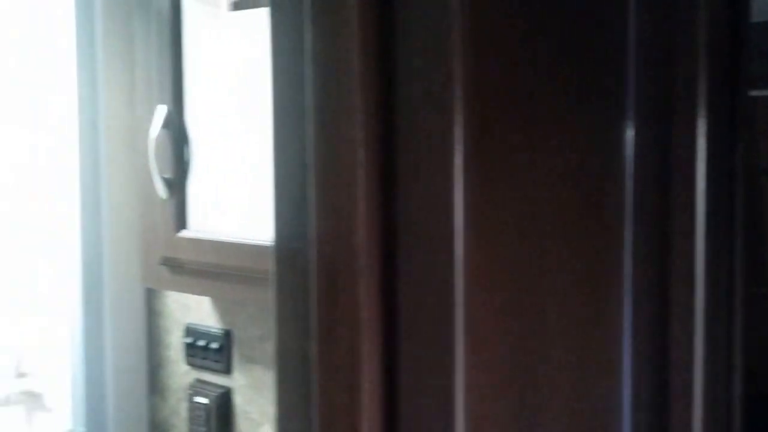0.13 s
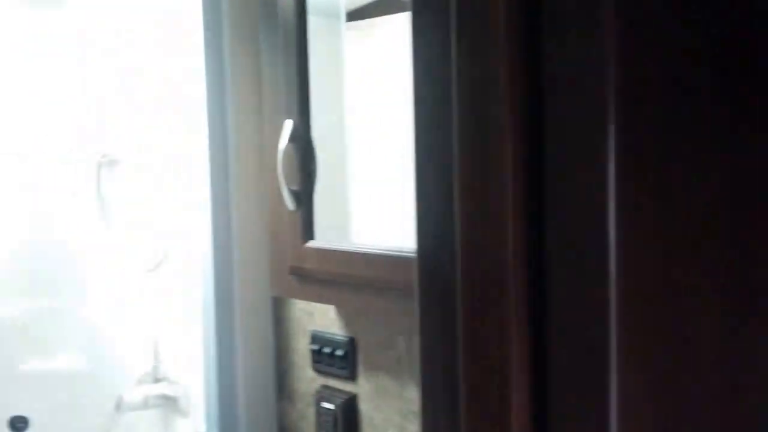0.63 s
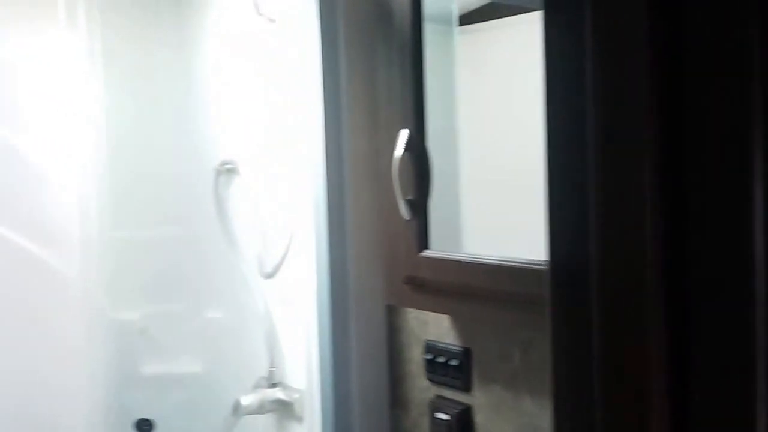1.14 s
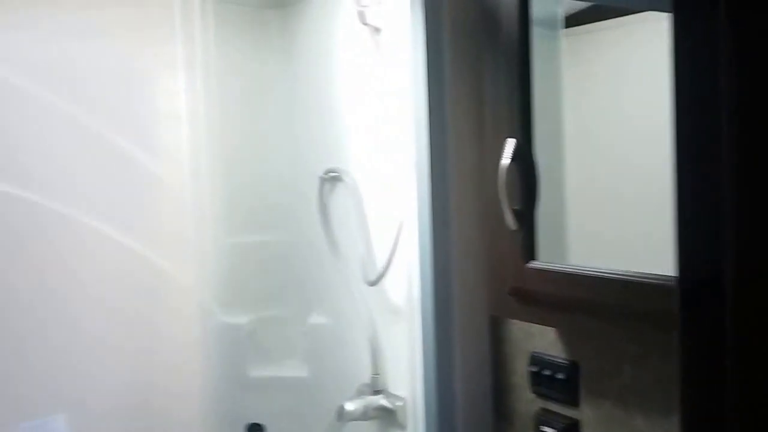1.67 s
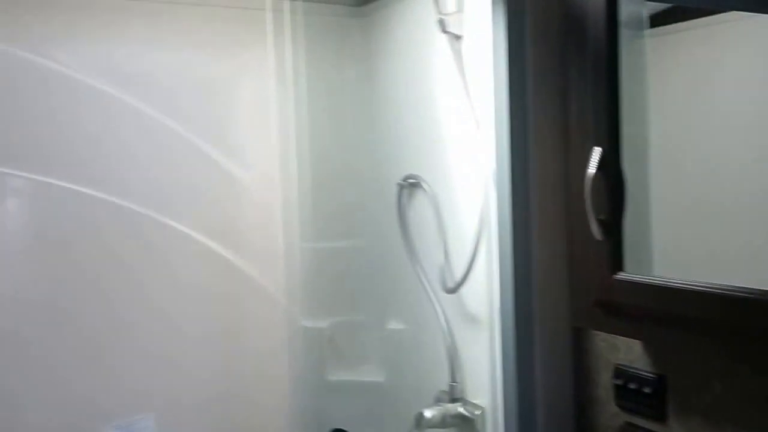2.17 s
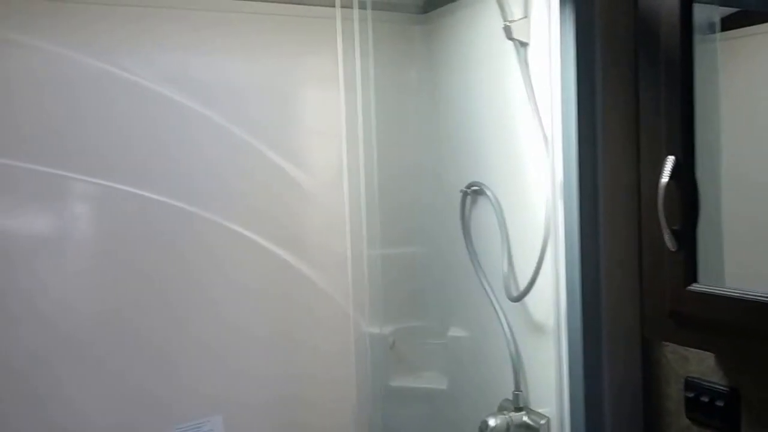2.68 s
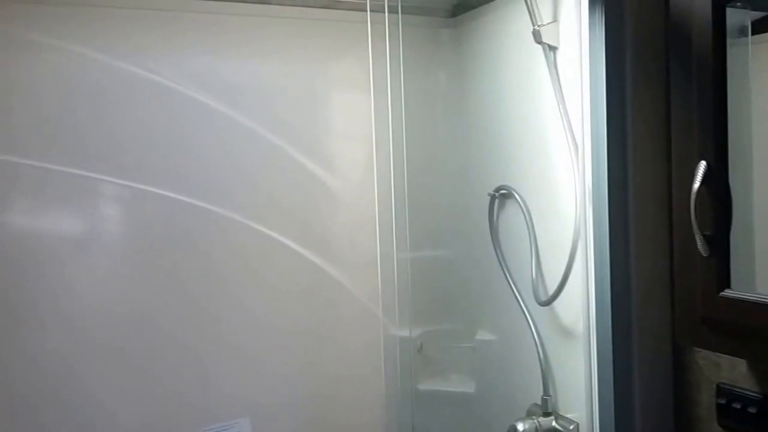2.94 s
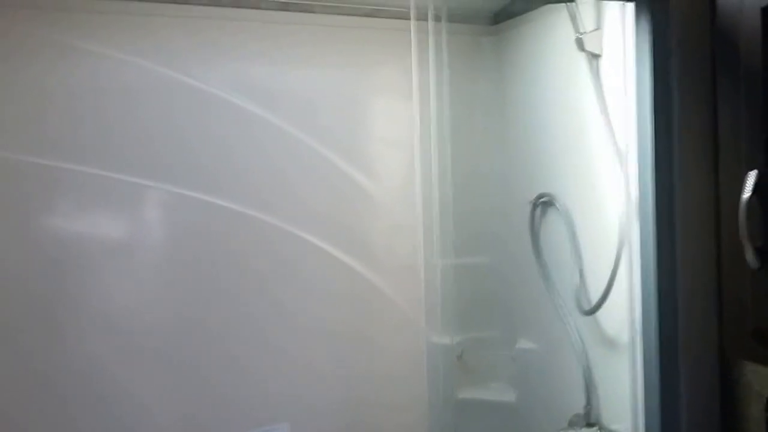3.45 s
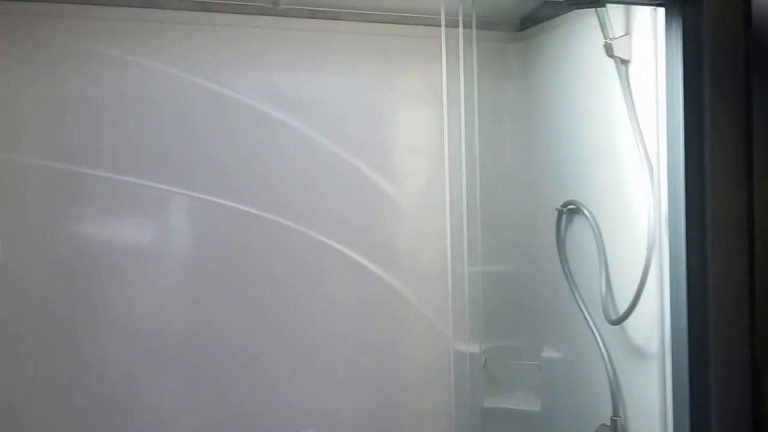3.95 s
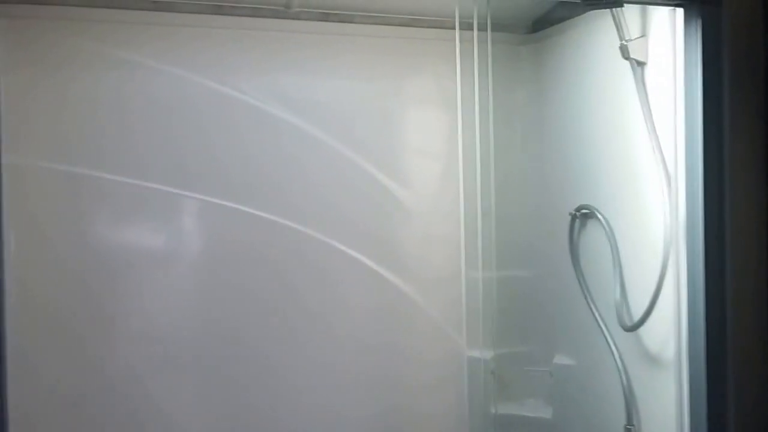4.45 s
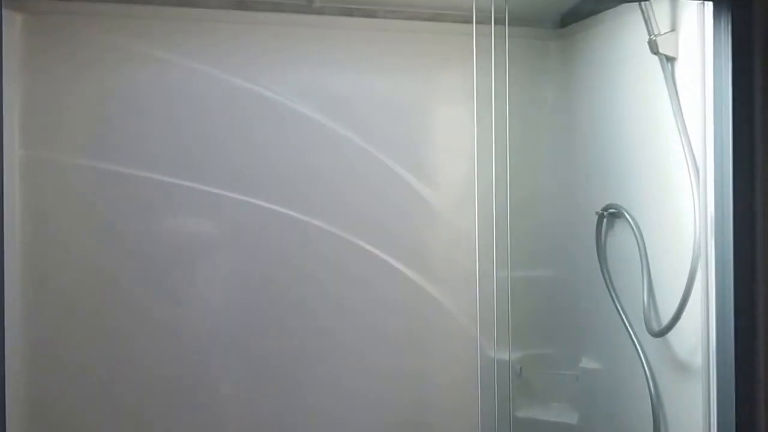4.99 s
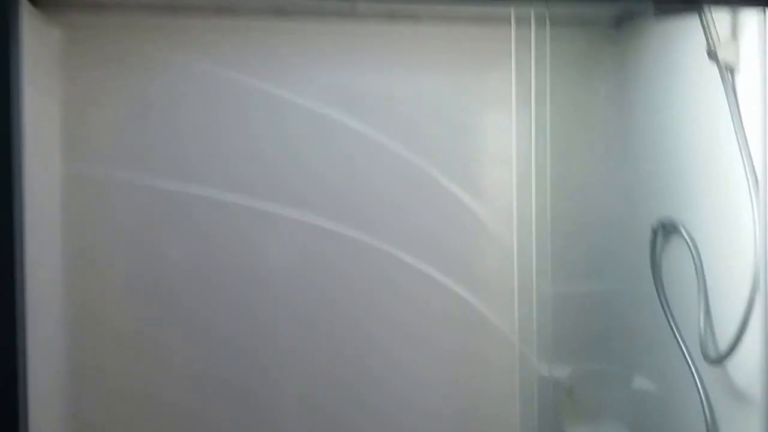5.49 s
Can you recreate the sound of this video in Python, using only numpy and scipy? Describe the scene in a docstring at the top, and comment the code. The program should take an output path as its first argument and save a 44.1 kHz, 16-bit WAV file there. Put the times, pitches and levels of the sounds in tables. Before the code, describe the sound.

Handling noise in a quiet camper: bass tremor from the gripping hand, skin rubbing plastic, scattered dull knocks, and one hard rattling blow near the end.

```python
"""Handling noise in a quiet camper

A hand-held camera is carried through a quiet camper, over faint microphone hiss and a weak hum.
The gripping hand is heard as a throbbing bass tremor and as shaped noise where skin slides on plastic.
Dull knocks are short tones of falling pitch with a noisy crunch; thin swishes are narrow noise bands.
One hard blow sets a small part rattling: rough taps that excite a few resonances.
"""
import sys
import numpy as np
from scipy import signal
from scipy.fft import rfft, irfft, next_fast_len
from scipy.io import wavfile
from scipy.ndimage import uniform_filter1d, map_coordinates

SR = 44100
rng = np.random.default_rng(int(sys.argv[2]) if len(sys.argv) > 2 else 0)


def digitize_waveform(pressure):
    """Quantize a signal to 16-bit integers and store it at the path in sys.argv[1].

    Rows of a 2-D input are taken as channels; values are limited to [-1, 1].
    """
    field = np.atleast_2d(pressure).T
    bounded = np.clip(field, -1, 1)
    quanta = np.round(bounded * 32767).astype(np.int16)
    wavfile.write(sys.argv[1], SR, quanta)


def gain_from_decibels(decibels):
    """Convert decibel values to linear amplitude factors."""
    exponent = np.asarray(decibels, float) / 20
    return 10 ** exponent


N = 247401  # length in samples


def unit(x):
    """Scales a sound to rms 1."""
    return x / np.sqrt(np.mean(x ** 2) + 1e-20)


def along(points, hz):
    """Reads (f/Hz, value) points on a logarithmic frequency axis."""
    f, value = np.transpose(points)
    return np.interp(np.log(hz + 1), np.log(f + 1), value)


def curves(rows):
    """Gives one value per sample for each column after the time."""
    times, *columns = np.transpose(rows)
    return [np.interp(np.arange(N) / SR, times, column) for column in columns]


def wobble(rate):
    """Draws a smooth random curve with rate knots a second."""
    knots = rng.standard_normal(N // 50)
    return map_coordinates(knots, [np.arange(N) * rate / SR])


def filtered(x, response):
    """Filters x by a response that may be complex, given as a function of frequency in Hz."""
    size = next_fast_len(N + SR // 2)
    hz = np.fft.rfftfreq(size, 1 / SR)
    return irfft(rfft(x, size) * response(hz), size)[..., :N]


def noise(spectrum):
    """Makes coloured noise of rms 1."""
    white = rng.standard_normal(N)
    return unit(filtered(white, lambda hz: gain_from_decibels(along(spectrum, hz))))


# Colour of the microphone noise: (f/Hz, level/dB per Hz)
HISS = [(150, -36.5), (250, -1.5), (600, -1.5), (1000, 0), (1550, -.5), (3600, -4.5), (4600, -10.5),
        (16000, -18)]
# How alike the noise is at the two ports: (f/Hz, left-right likeness)
HISS_ALIKE = [(60, 0.87), (180, 0.32), (550, 0.31), (1650, 0.98), (4970, 0.27), (15000, 0.15)]


def hiss():
    """Microphone noise: two independent noises are mixed so that both ports share part of it."""
    level_db = -76

    def mix(hz):
        turn = np.arccos(np.clip(along(HISS_ALIKE, hz), -1, 1)) / 2
        return np.array([np.cos(turn), np.sin(turn)])

    mid, side = filtered(np.array([noise(HISS), noise(HISS)]), mix)
    return gain_from_decibels(level_db) * np.array([mid + side, mid - side])


# Loudness of the hum before it wavers: (t/s, level/dB)
HUM = [(0, -85), (4.6, -84), (4.8, -73), (5.0, -78), (5.35, -66), (5.61, -68)]


def hum():
    """A weak low tone whose level and pitch waver."""
    level_db = curves(HUM)[0] + 3 * wobble(9)
    hz = 188 + 4 * wobble(12)
    return gain_from_decibels(level_db) * np.sin(2 * np.pi * np.cumsum(hz) / SR)


# Two thin swishes, each a list of rows: (t/s, centre f/Hz, level/dB)
SWISH = [
    [(0.0, 5100, -72), (0.08, 4700, -75), (0.2, 4050, -78), (0.38, 3890, -80), (0.45, 3800, -100)],
    [(5.285, 6250, -66), (5.383, 6100, -73), (5.473, 5800, -71), (5.54, 5400, -80), (5.61, 5110, -76)],
]
# Colour of the broad hiss under them: (f/Hz, level/dB per Hz)
SKIRT = [(1000, -11), (2200, 2), (4500, -3.5), (7000, -21.5)]


def swish():
    """A narrow band of noise on a broad hiss; its centre sinks as the slide slows."""
    out, t = np.zeros(N), np.arange(N) / SR

    def band_shape(f):
        return 1 / (1 + (f / 480) ** 2) + 0.26 / (1 + (f / 1200) ** 4)

    for rows in SWISH:
        centre_hz, db = curves(rows)
        low_noise = filtered(rng.standard_normal(N), band_shape)
        # multiplying by a sine moves the low noise up to the centre
        band = unit(low_noise * np.sin(2 * np.pi * np.cumsum(centre_hz) / SR))
        active = 1. * (t >= rows[0][0]) * (t <= rows[-1][0])
        on = uniform_filter1d(active, size=1800)  # softened ends
        out += on * gain_from_decibels(db) * (band + .85 * noise(SKIRT))
    return out


# Strength of the muscle tremor, also used for the resting hand: (t/s, level/dB)
GRIP = [(0.0, -53), (0.2, -47), (0.7, -45), (1.14, -48), (1.37, -43), (1.6, -55), (1.72, -48), (1.97, -46),
        (2.36, -54), (3.1, -52), (3.22, -64), (3.58, -56), (4.14, -62), (4.3, -47), (4.47, -44), (4.7, -59),
        (5.1, -57), (5.45, -52), (5.61, -62)]
# Colour of the tremor: (f/Hz, level/dB per Hz)
TREMOR = [(15, -50.5), (25, -26.5), (40, -10.5), (81, -2), (97, -10), (216, -27.5), (250, -28.5),
          (320, -55), (550, -120)]


def tremor():
    """Muscle tremor: bass noise that throbs at random."""
    throbbing = gain_from_decibels(1.6 * wobble(8.5)) * noise(TREMOR)
    return gain_from_decibels(curves(GRIP)[0]) * unit(throbbing)


# Short scuffs and, in the last row, a brief noise that leads into the hard blow: (peak t/s, rise/s per 10 dB,
# fall/s per 10 dB, dull level/dB, bright level/dB) # Rise and fall are those of the dull rub; the bright level
# is before the speed dulls it.
SHORT_SWELLS = [(1.66, .025, .08, -55, -76), (1.712, .05, .03, -49, -57), (1.845, .05, .05, -52, -72),
                (1.94, .045, .07, -44, -53), (2.04, .05, .07, -50, -64), (2.16, .03, .06, -60, -78),
                (2.3, .07, .055, -54, -72), (2.47, .02, .05, -65, -76), (2.8, .05, .03, -66, -80),
                (2.98, .07, .05, -60, -70), (3.5, .06, .04, -68, -85), (3.6, .04, .12, -70, -77),
                (4.24, .04, .05, -68, -85), (4.33, .042, .045, -47, -46), (4.53, .006, .05, -57, -64),
                (4.87, .04, .08, -72, -85), (5.2, .08, .03, -64, -85), (5.238, .006, .01, -42, -55)]
# Long slides of the skin, each a list of rows: (t/s, dull level/dB, bright level/dB, speed 0-1)
# The bright level is before the speed dulls it.
SLIDES = [
    [(0.0, -48.5, -47, .49), (0.27, -54.5, -48, .63), (0.56, -52, -51, .62), (0.81, -58, -55, .43),
     (0.85, -62, -64, .45), (0.95, -68, -75, .6)],
    [(1.2, -62, -66, .6), (1.228, -50, -41, .55), (1.25, -51, -45, .72), (1.275, -54, -49, .72),
     (1.29, -53, -46, .72), (1.34, -56, -52.5, .78), (1.42, -54, -52, .65), (1.447, -47, -45, .55),
     (1.47, -57, -69, .75), (1.58, -68, -80, .9)],
    [(4.36, -58, -62, .5), (4.42, -58, -60, .55), (4.445, -57, -54, .62), (4.52, -65, -68, .7),
     (4.63, -74, -76, .7)],
    [(5.26, -62, -54, .5), (5.3, -57.5, -60, .44), (5.44, -64, -65, .3), (5.452, -68, -56, .95),
     (5.5, -68, -62, .85), (5.54, -69, -67, .3), (5.61, -63, -67, .5)],
]


def rubbing():
    """Gains of the dull and bright rub and the speed: resting hand, short swells and slides add in power."""
    rest_dull_db, rest_bright_db = -23, -27.5  # a trembling hand rustles: relative to the tremor
    rest_speed, swell_speed = 1.1, .48
    bright_steeper = 1.7  # the bright rub of a scuff rises and falls more steeply
    t = np.arange(N) / SR
    grip_db = curves(GRIP)[0]
    dull, rest = gain_from_decibels(grip_db + rest_dull_db), gain_from_decibels(grip_db + rest_bright_db)
    bright = rest
    for s, rise, fall, dull_db, bright_db in SHORT_SWELLS:
        shape = gain_from_decibels(-10 * np.maximum((s - t) / rise, (t - s) / fall))
        dull = np.hypot(dull, gain_from_decibels(dull_db) * shape)
        bright = np.hypot(bright, gain_from_decibels(bright_db) * shape ** bright_steeper)
    rest_share = (rest / bright) ** 2
    speed = swell_speed + (rest_speed - swell_speed) * rest_share
    for rows in SLIDES:
        dull_db, bright_db, pace = curves(rows)
        on = (t >= rows[0][0]) & (t <= rows[-1][0])
        dull = np.hypot(dull, on * gain_from_decibels(dull_db))
        bright = np.hypot(bright, on * gain_from_decibels(bright_db))
        speed = np.where(on, pace, speed)
    return dull, bright, speed


# Colour of the dull rub: (f/Hz, level/dB per Hz)
DULL = [(80, -51), (140, -0.5), (300, -1.5), (600, -10), (1100, -22.5), (2500, -51), (5000, -100)]
# Colour of the bright rub before the speed dulls it: (f/Hz, level/dB per Hz)
BRIGHT = [(250, -36), (550, 7.5), (1300, 4), (4000, -5)]


def skin():
    """Skin sliding on plastic: unsteady noise in two colours; a faster slide reaches higher."""
    dull_gain, bright_gain, speed = rubbing()
    slips = wobble(45)  # shared by both rubs
    dull = unit(gain_from_decibels(2.0 * slips + 0.5 * wobble(120)) * noise(DULL))
    rough = gain_from_decibels(.8 * slips + 1.1 * wobble(220)) * noise(BRIGHT)
    hz, t, frames = signal.stft(rough, SR, nperseg=512)
    edge_hz = 700 * 5.2 ** np.interp(t, np.arange(N) / SR, speed)
    dulled = frames / np.sqrt(1 + (hz[:, None] / edge_hz) ** 7)
    bright = signal.istft(dulled, SR, nperseg=512)[1][:N]
    return dull_gain * dull + bright_gain * bright


# Bounces of a loose part after the hard blow: (t/s, level/dB)
RATTLE = [(5.24, -21), (5.2475, -27), (5.2545, -26), (5.2605, -33), (5.269, -29), (5.284, -36)]
# Resonances of that part: (f/Hz, width/Hz, level/dB)
PART = [(1500, 900, -0.5), (3975, 1000, 2.5), (5860, 820, 1), (14500, 1400, -8)]


def rattle():
    """Each bounce is a short rough contact, a burst of noise, into the part's resonances."""
    chatter_s, chatter_db = .0028, -4  # each bounce touches a second time, later and weaker
    taps, t = np.zeros(N + SR), np.arange(SR // 20) / SR
    fade = gain_from_decibels(-60 * t / 0.0038) + .06 * gain_from_decibels(-60 * t / 0.03)
    second = [(s + chatter_s, db + chatter_db) for s, db in RATTLE]
    for s, db in RATTLE + second:
        taps[round(s * SR):][:len(t)] += gain_from_decibels(db) * fade * rng.standard_normal(len(t))

    def ring(f):
        total = 0
        for k, (centre, width, db) in enumerate(PART):
            resonance = 1j * f * width / (centre ** 2 - f ** 2 + 1j * f * width)
            total = total + (-1) ** k * gain_from_decibels(db) * resonance  # signs alternate
        return total

    return filtered(taps[:N], ring)


# Knocks on the shell: (t/s, level/dB, first f/Hz, last f/Hz, crunch level/dB)
# Levels are before the swell of each onset.
KNOCKS = [(1.203, -19, 199, 110, -55), (1.2137, -21, 460, 153, -57), (1.2236, -10.5, 456, 62, -34.5),
          (1.2814, -28, 700, 150, -39), (1.447, -27.5, 447, 88.5, -45), (1.71, -28, 258, 90, -58),
          (1.938, -17, 200, 86, -49), (3.129, -21, 120, 68, -68.5), (3.5745, -17.5, 480, 230, -66),
          (3.5795, -21, 260, 76, -70), (3.584, -25, 300, 109, -73), (3.639, -20, 110, 70, -67),
          (4.298, -25, 396, 92, -54), (4.314, -10, 200, 110, -49), (4.3216, -16, 432, 112, -42),
          (4.328, -11, 256, 90, -39), (4.339, -16, 665, 110, -41), (4.4325, -10.5, 417, 57.3, -43.5),
          (4.527, -27.5, 450, 75.4, -55), (4.54, -25, 244, 73.5, -63), (4.862, -28, 113, 64, -70),
          (5.2398, 2, 1206, 48.2, -22.5), (5.2416, -12, 1500, 509, -27)]
# Colour of the crunch: (f/Hz, level/dB per Hz)
CRUNCH = [(150, -46), (300, -8.5), (700, 6), (2000, -9.5), (3500, -24), (6000, -48.5), (9000, -92.5)]


def knocks():
    """Bending waves in the shell: the high part arrives first, so the pitch drops within a cycle or two."""
    ring_cycles = 3.6  # cycles of the last pitch to fall 60 dB
    hard_hz, hard_damps = 450, .45  # a contact harder than this first pitch damps sooner
    out, crunch, t = np.zeros(N + SR), np.zeros(N + SR), np.arange(SR // 4) / SR
    crunch_fade = gain_from_decibels(-60 * t / 0.026) + 0.24 * gain_from_decibels(-60 * t / 0.058)
    crunch_shape = (1 - np.exp(-t / 0.0012)) * crunch_fade
    for s, db, first_hz, last_hz, crunch_db in KNOCKS:
        t60 = ring_cycles / last_hz * max(first_hz / hard_hz, 1) ** -hard_damps
        glide = .4 / first_hz  # seconds for half of the pitch fall
        cycles = last_hz * t + (first_hz - last_hz) * glide * np.log1p(t / glide)
        # low blows are soft and swell slowly
        swell = (1 - np.exp(-t * first_hz ** 2 / 130)) ** 2
        start = round(s * SR)
        out[start:][:len(t)] -= gain_from_decibels(db - 60 * t / t60) * swell * np.sin(2 * np.pi * cycles)
        crunch[start:][:len(t)] += gain_from_decibels(crunch_db) * crunch_shape
    return out[:N] + crunch[:N] * noise(CRUNCH)


# Difference in colour between the microphone ports: (f/Hz, left minus right level/dB)
PORTS = [(800, -1), (2400, -2.5), (4500, -8), (8000, -10), (12000, 5.5), (15000, 0.5)]


def scene():
    """All but the hiss goes through the shell; two ports differ in colour and lose the deepest bass."""
    shell = hum() + swish() + tremor() + skin() + rattle() + knocks()

    def ports(hz):
        low_cut = -hz ** 2 / (48 ** 2 - hz ** 2 + 1.3j * 48 * hz)
        return low_cut * gain_from_decibels(np.outer([.5, -.5], along(PORTS, hz)))

    return hiss() + filtered(shell, ports)


# Colour of the treble that rides on loud sound: (f/Hz, level/dB per Hz)
FIZZ = [(3000, -14.5), (8000, -18), (12000, -9), (15000, -7.5), (16500, -17)]


def fizz(dry):
    """Treble hiss that swells gently with the loudness and lingers; the sides share part of it."""
    linger = np.exp(-np.arange(SR // 2) / SR / .028)  # decay time 28 ms
    power = signal.fftconvolve(dry.mean(0) ** 2, linger / linger.sum())[:N]
    power = np.abs(power) + 1e-9
    shared = noise(FIZZ)
    pair = np.array([shared + .45 * noise(FIZZ), shared + .45 * noise(FIZZ)])
    return gain_from_decibels(-70) * power ** 0.11 * pair


def roll_off(x):
    """The treble ends steeply here."""
    return signal.sosfilt(signal.butter(12, 17110, fs=SR, output="sos"), x)


def record(dry):
    """Adds the treble that follows the loudness, then clips the hardest blow with a rounded limit."""
    x = dry + fizz(dry)
    clipped = x / (1 + np.abs(x / .97) ** 6) ** (1 / 6)
    return roll_off(clipped)


dry = scene()
out = record(dry)
digitize_waveform(out)
```